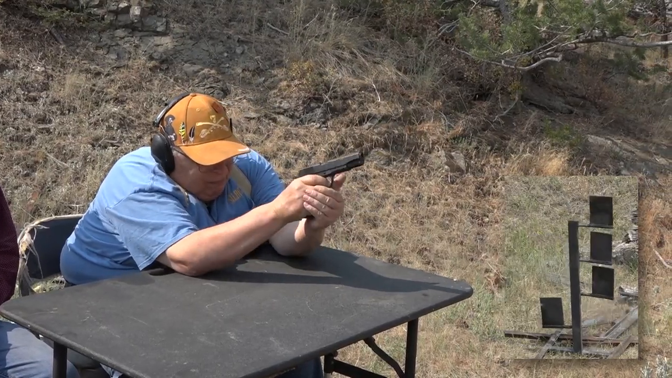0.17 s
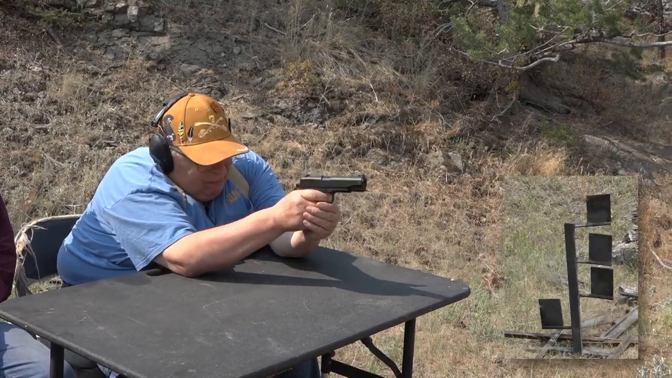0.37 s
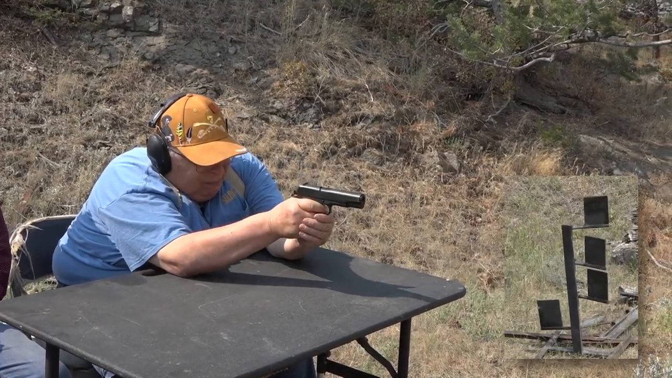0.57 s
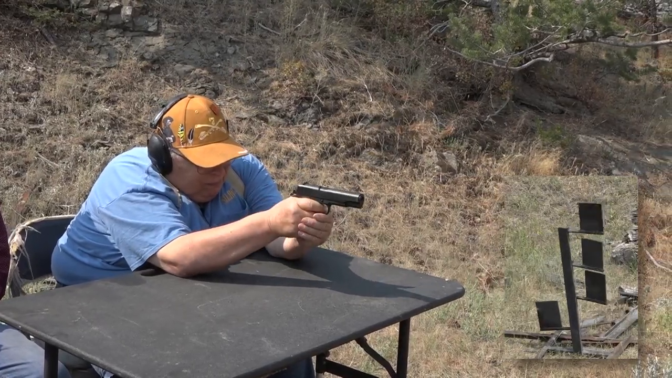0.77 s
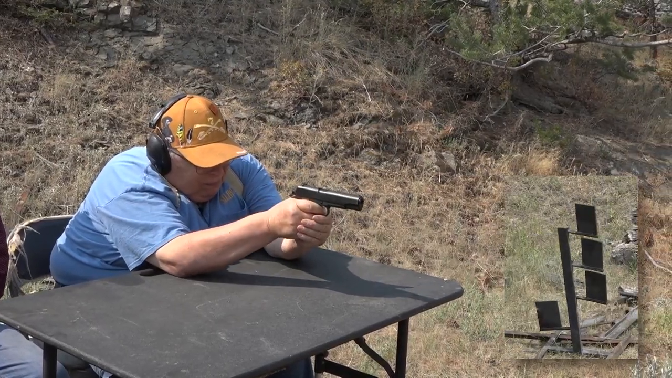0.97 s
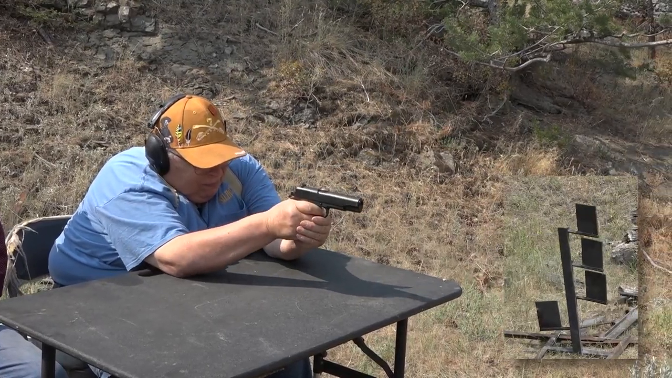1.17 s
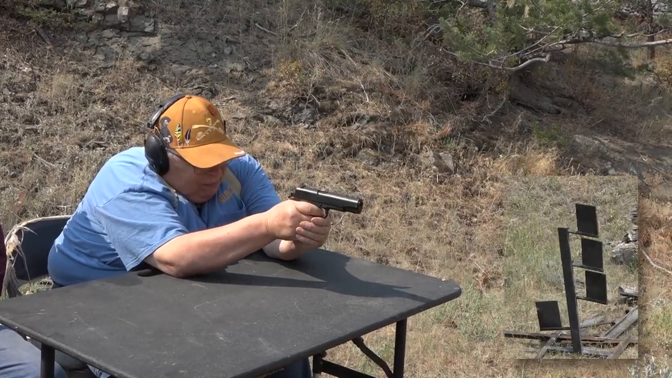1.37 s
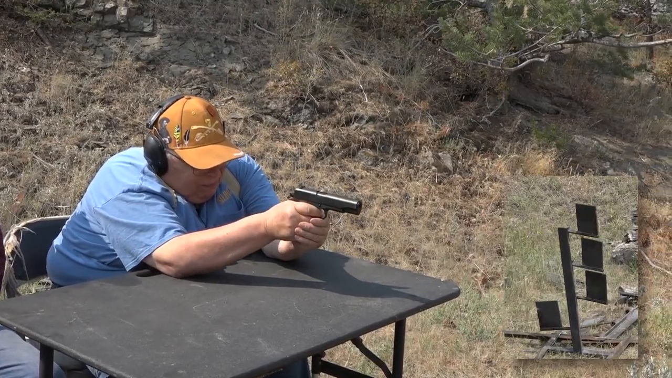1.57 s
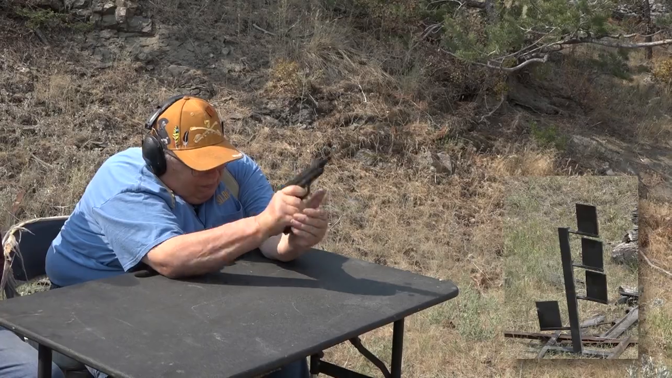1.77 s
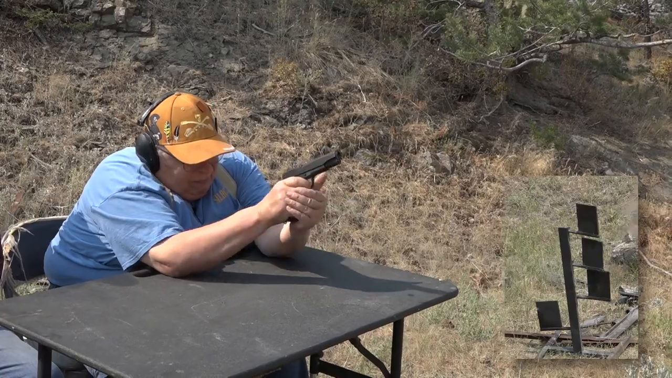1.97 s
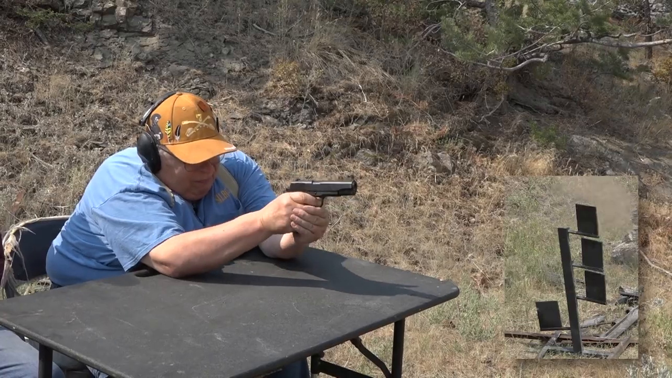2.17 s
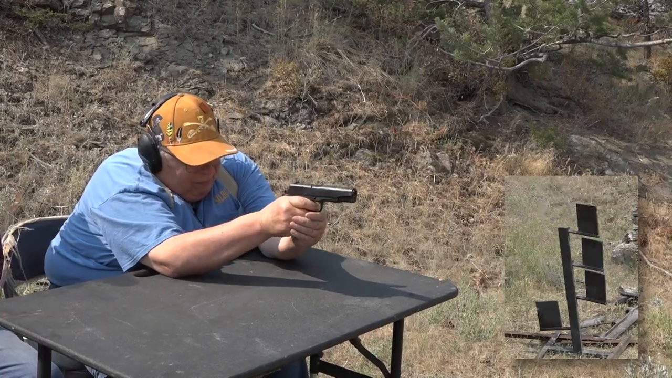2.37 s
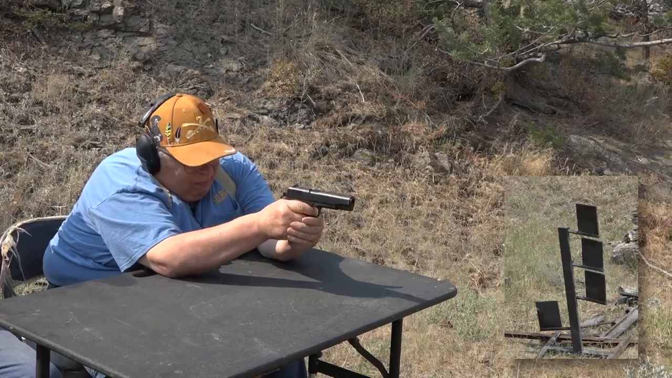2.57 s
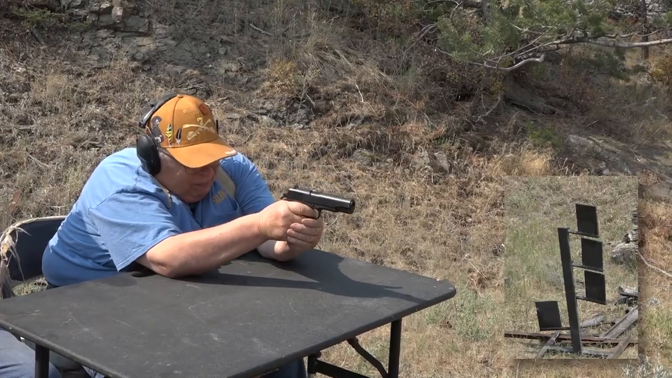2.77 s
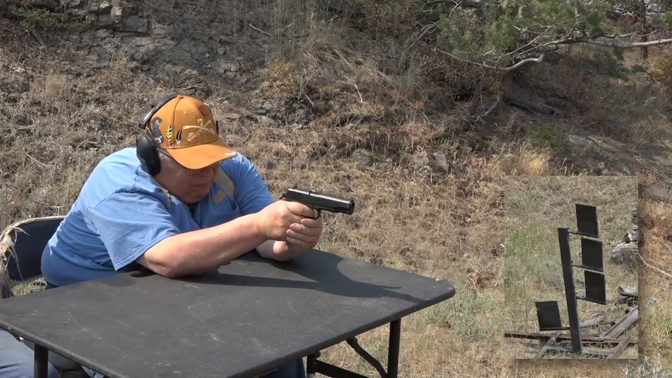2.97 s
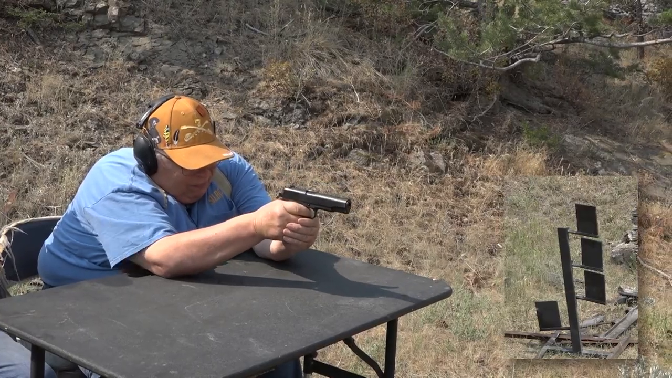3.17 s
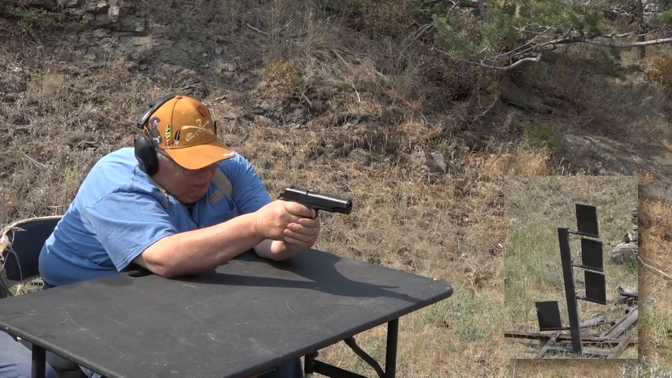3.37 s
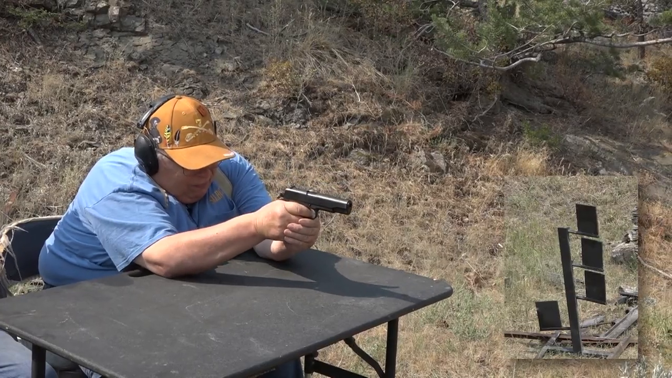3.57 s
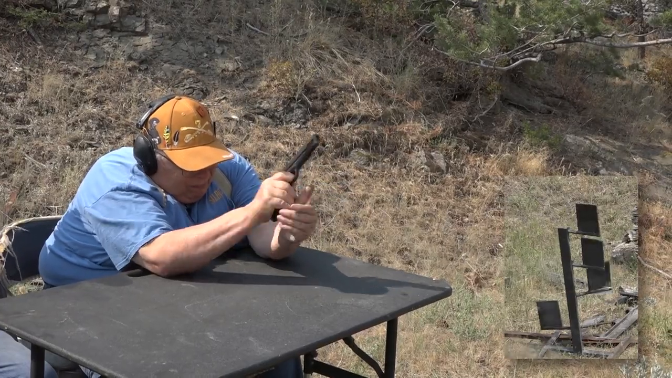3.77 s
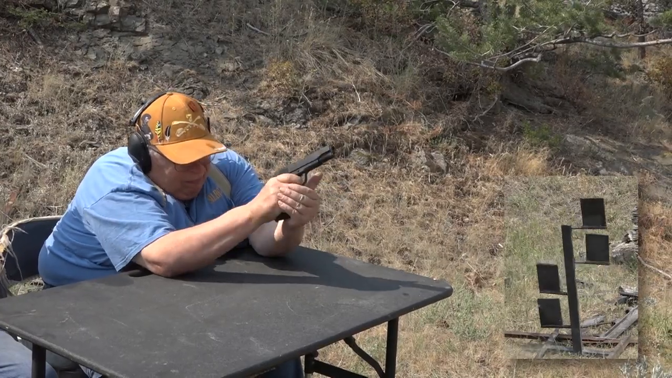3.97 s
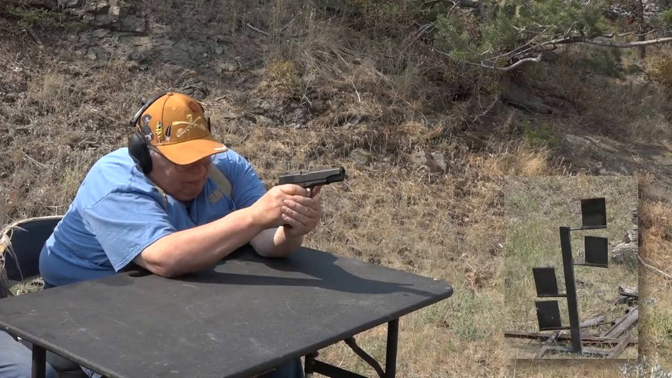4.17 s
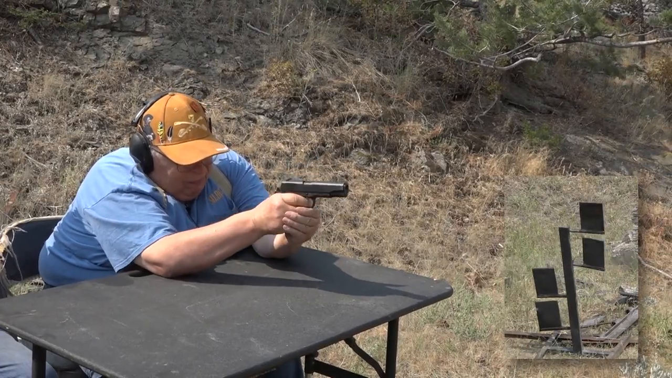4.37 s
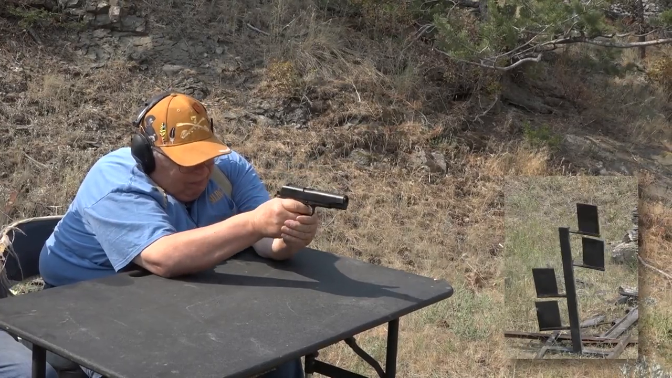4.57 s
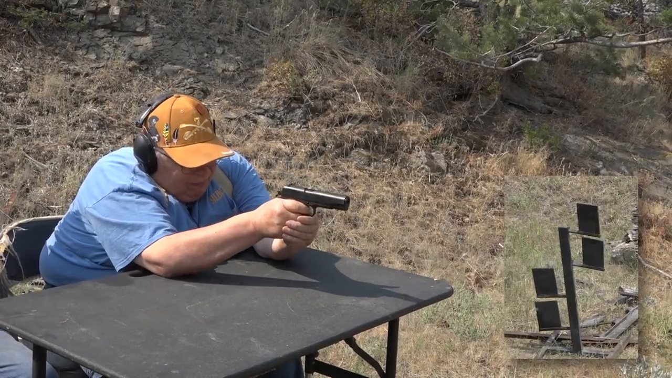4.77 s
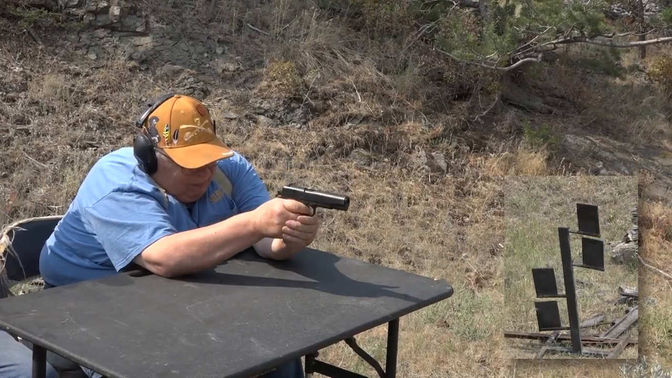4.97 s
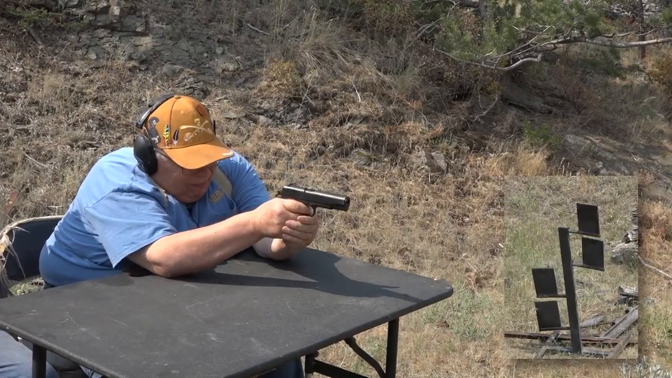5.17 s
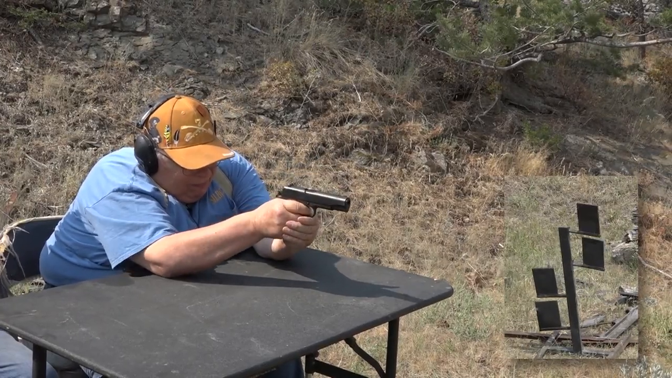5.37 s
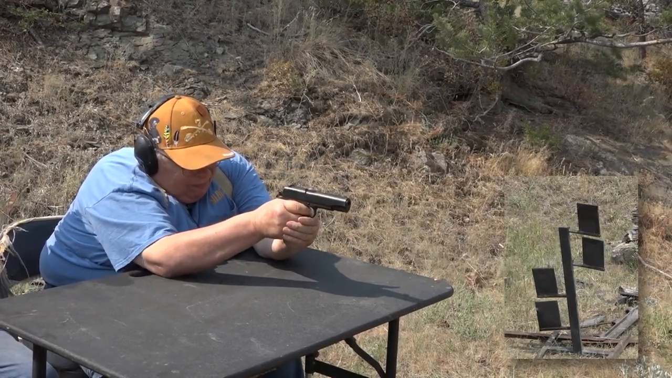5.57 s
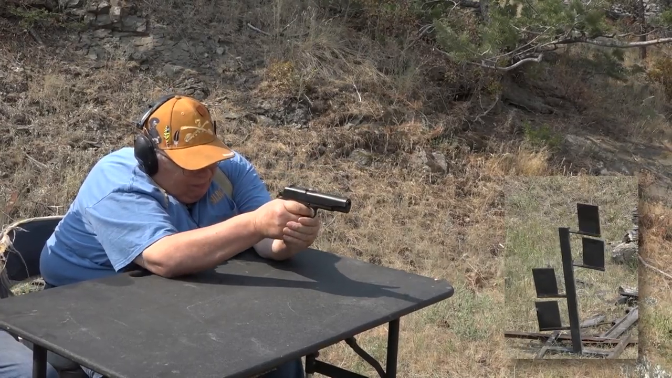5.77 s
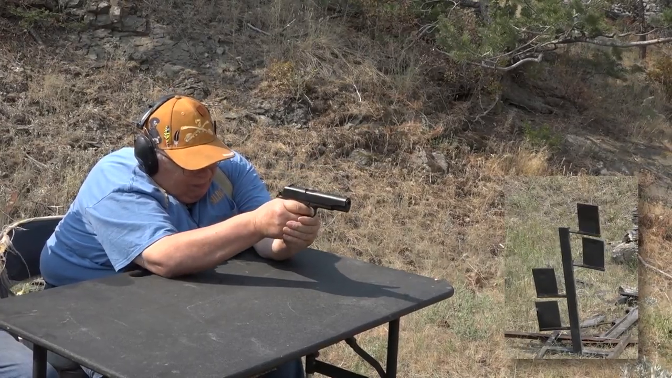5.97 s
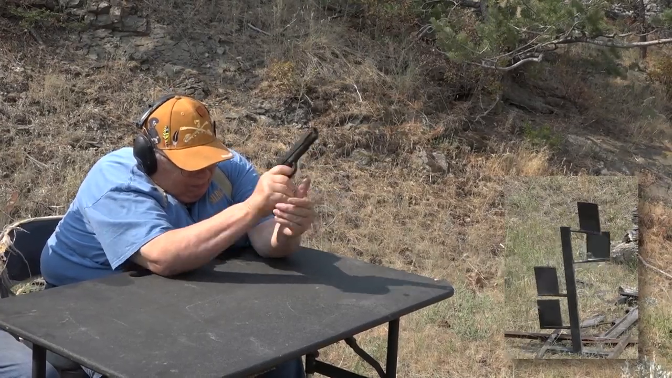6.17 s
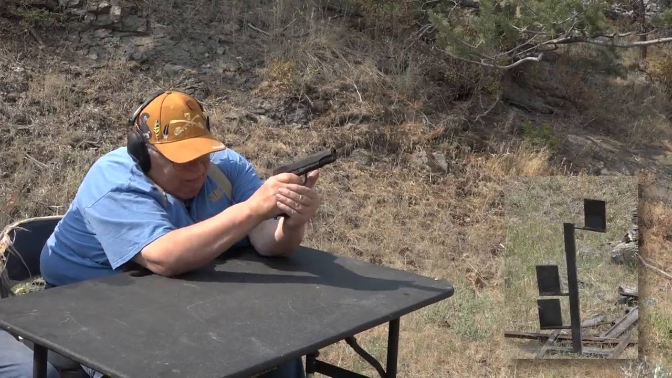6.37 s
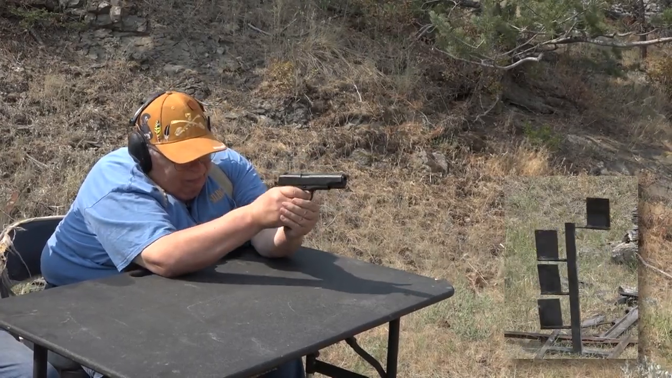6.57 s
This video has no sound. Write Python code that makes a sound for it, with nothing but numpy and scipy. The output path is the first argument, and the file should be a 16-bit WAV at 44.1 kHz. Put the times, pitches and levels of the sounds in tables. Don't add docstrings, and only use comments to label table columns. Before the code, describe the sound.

Three loud pistol blasts about two seconds apart outdoors, each answered by a short metallic clang and rolling echo over gusty wind.

```python
import sys
import numpy as np
from scipy import signal
from scipy.fft import rfft, irfft, next_fast_len
from scipy.io import wavfile

SR = 44100
rng = np.random.default_rng(int(sys.argv[2]) if len(sys.argv) > 2 else 0)


def boost_factor(decibels):
    exponent = np.asarray(decibels, float) / 20
    return 10 ** exponent


def digitize_waveform(pressure):
    field = np.atleast_2d(pressure).T
    bounded = np.clip(field, -1, 1)
    quanta = np.round(bounded * 32767).astype(np.int16)
    wavfile.write(sys.argv[1], SR, quanta)


N = 292455
T = np.arange(N) / SR
RIGHT_LEAD_S = .0022

# start in seconds, level in dB, far hillside echo in dB.
SHOTS = [
    (-.103, 0.9, -4.5),
    (1.814, -0.02, -4.5),
    (3.784, 0.77, -1),
    (6.169, 0.65, -4.5),
]
# frequency in Hz, gain in dB per second of travel.
AIR_LOSS = [(3500, -4.8), (6500, -16.5), (10000, -32), (14000, -71.5)]


def rms_one(x):
    return x / np.sqrt(np.mean(x ** 2) + 1e-20)


def colour(x, spectrum):
    hz, db = np.transpose(spectrum)
    size = next_fast_len(x.shape[-1])
    grid_hz = np.arange(size // 2 + 1) * SR / size + 1
    gain = boost_factor(np.interp(np.log(grid_hz), np.log(hz), db))
    return irfft(rfft(x, size) * gain, size)[..., :x.shape[-1]]


def drift(rate_hz, size):
    r = np.exp(-80 * np.pi * rate_hz / SR)
    slow = signal.lfilter([1], [1, -2 * r, r * r], rng.standard_normal((2, size // 40 + 2002)))
    at = np.arange(size) / 40 + 2000
    return np.array([np.interp(at, np.arange(len(s)), rms_one(s)) for s in slow])


def resonate(x, hz, width_hz):
    r = np.exp(-np.pi * width_hz / SR)
    poles = [1, -2 * r * np.cos(2 * np.pi * hz / SR), r * r]
    return signal.lfilter([(1 - r * r) / 2, 0, (r * r - 1) / 2], poles, x)


def burst(t60_s, rise_s, size):
    t = np.arange(size) / SR
    return boost_factor(-60 * t / t60_s) * (1 - np.exp(-t / rise_s))


def sides(left_right_db):
    return boost_factor(np.array([[.5], [-.5]]) * left_right_db)


def peak_one(x):
    return x / np.abs(x).max(1, keepdims=True)


def add(out, at_s, x):
    i = round(at_s * SR)
    part = x[:, max(-i, 0):max(out.shape[1] - i, 0)]
    out[:, max(i, 0):max(i, 0) + part.shape[1]] += part


def add_spaced(out, at_s, x):
    add(out[:1], at_s, x[:1])
    add(out[1:], at_s - RIGHT_LEAD_S, x[1:])


def trees():
    # frequency in Hz, level in dB per Hz.
    rustle = [(24, -45.5), (40, -17), (194, -4.5), (329, -17.5), (363, -4.5), (467, -7), (1150, -1.5),
              (1300, -3.5), (1410, -5), (2260, -13.5), (14500, -44), (16000, -47)]
    # frequency in Hz, left-right in dB.
    tilt = [(60, -0.5), (110, 2), (200, -4), (380, -6), (700, -4.5), (1290, -6.5), (2380, 1.5), (4400, 5),
            (8120, 3.5), (15000, 6.5)]
    noise = colour(rng.standard_normal((2, N)), rustle)
    noise = colour(noise, [(12800, 0), (13500, -8), (15500, -16)])
    left = colour(noise[0], [(hz, db / 2) for hz, db in tilt])
    right = colour(noise[1], [(hz, -db / 2) for hz, db in tilt])
    shot_s = np.array(SHOTS)[:, 0]
    since_s = T - shot_s[np.searchsorted(shot_s, T) - 1]
    breeze_db, recover_db_per_s = -57, 2.22
    level_db = breeze_db + recover_db_per_s * since_s + .6 * drift(1.7, N)
    return boost_factor(level_db) * rms_one(np.array([left, right]))


def wind():
    # centre in seconds, peak in dB, left-right in dB, half length in seconds.
    gusts = [(.22, -53, 14.5, 0.13), (.5, -55.5, -12, 0.32), (0.888, -49.5, 22, 0.097),
             (1.12, -54, 10.5, 0.11), (1.3, -55.5, 6.5, 0.18), (1.57, -46.5, 9.5, 0.18),
             (2.24, -44.5, 5.5, 0.091), (2.389, -49, 5.5, 0.068), (2.592, -63.5, -16.5, 0.22),
             (3.14, -58.5, -19.5, 0.14), (3.386, -52.5, -22.5, 0.074), (3.483, -58, 23, 0.078),
             (3.698, -47, 7, 0.15), (4.1, -58.5, 0, 0.31), (4.623, -59, -4, 0.34), (5.05, -57, 14.5, .12),
             (5.209, -55, -22.5, 0.051), (5.32, -61, 12, 0.14), (5.6, -55.5, 11.5, 0.085),
             (5.8, -39.5, -3, 0.098), (6.102, -41.5, 1.5, 0.13), (6.485, -44, -3, 0.23)]
    lull_db, lumpy_db = -78, 3.0
    edge_db, edge_growth = -12, 0.15
    swells = sum(sides(pan_db) * boost_factor(db - 10 * ((T - s) / half_s) ** 2) for s, db, pan_db, half_s in gusts)
    side_db = 20 * np.log10(boost_factor(lull_db) + swells) + lumpy_db * drift(22, N)
    low, high = rng.standard_normal((2, 2, N))
    rumble = rms_one(colour(low, [(20, -36.5), (60, -4.5), (110, 0.46), (250, -5.5), (500, -12.5),
                                  (2000, -78.5)]))
    edge = rms_one(colour(high, [(100, -8.5), (300, -1.1), (700, -12), (2000, -28.5), (8000, -65.5)]))
    edge_gain = boost_factor(edge_db + edge_growth * (side_db + 52.5))
    return boost_factor(side_db - 0.5) * (rumble + edge * edge_gain)


def puffs():
    # start in seconds, peak in dB, t60 in seconds.
    eddies = [
        (0.843, -19, 0.043),
        (1.094, -32, 0.11),
        (1.604, -35, 0.24),
        (3.357, -54, 0.13),
        (4.985, -22.5, 0.14),
        (5.575, -45.5, 0.2),
    ]
    out = np.zeros((2, N))
    for at, db, t60 in eddies:
        x = colour(rng.standard_normal((1, 6000)),
                   [(40, -17), (130, -3.8), (510, -6), (2500, -34.5), (6000, -60), (20000, -80)])
        add(out[:1], at - .003, boost_factor(db + 1) * rms_one(x) * burst(t60, 0.007, 6000))
    return out


def creak():
    # start in seconds, length in seconds, pitch in Hz, level in dB.
    creaks = [
        (2.88, 0.224, 847, -66),
        (3.25, 0.069, 850, -61.5),
    ]
    drop_hz, drop_s = 39.5, .025
    out = np.zeros((2, N))
    for at, length, hz, db in creaks:
        t = np.arange(0, length, 1 / SR)
        ends = np.clip(np.minimum(t, length - t) / .03, 0, 1)
        fade = ends * boost_factor(2.5 * drift(40, len(t))[0])
        pitch_hz = hz + drop_hz * np.exp(-t / drop_s) + 14 * drift(30, len(t))[0]
        tone = np.sin(2 * np.pi * np.cumsum(pitch_hz) / SR)
        add(out, at, sides(-23.0) * boost_factor(db + 4.5) * fade * tone)
    return out


def rocking():
    # start in seconds, peak in dB.
    rocks = [(0.565, -40), (0.635, -43), (0.671, -40), (0.765, -40), (0.844, -42), (2.439, -43),
             (4.39, -40.5), (4.434, -40), (4.501, -47), (4.591, -42), (4.704, -42), (4.809, -46),
             (5.016, -48)]
    # start in seconds, number of touches, first touch in dB.
    settling = [
        (.524, 13, -44),
        (2.5, 3, -45),
        (4.46, 9, -45),
    ]
    # frequency in Hz, level in dB, width in Hz.
    stand = [(554, -1, 100), (617, -16, 15), (1056, -3, 210), (1343, -2.5, 51), (1794, -15, 250)]
    gap_s, fade_db = .052, .4
    touches = list(rocks)
    for start, count, db in settling:
        for k in range(count):
            touches.append((start + gap_s * (k + rng.uniform(-.3, .3)), db - fade_db * k))
    out, t = np.zeros((2, N)), np.arange(2500) / SR
    for at, db in touches:
        scuff = rng.standard_normal(2500) * np.exp(-(t / 0.016) ** 2)
        x = np.zeros(2500)
        for hz, mode_db, width_hz in stand:
            mode = resonate(resonate(scuff, hz, width_hz), hz, width_hz * 2)
            x += boost_factor(mode_db + rng.normal(0, 1.5)) * mode
        add(out, at - .003, boost_factor(db + 3.5) * boost_factor([[-16], [0]]) * x / np.abs(x).max())
    return out


def ticks():
    # start in seconds, peak in dB, left-right in dB.
    contacts = [
        (0.1501, -24, -8),
        (0.9268, -57, 12),
        (2.0223, -26, -3),
        (2.8479, -49, 23),
        (3.9833, -24, -6),
        (4.4894, -59, 10),
        (5.3694, -69.5, 4.5),
        (6.4961, -37.5, -30),
    ]
    out = np.zeros((2, N))
    for at, db, pan_db in contacts:
        x = resonate(rng.standard_normal((2, 900)) * burst(.009, .0001, 900), 10000, 9000)
        x = colour(x, [(2000, -25), (3200, 15), (5000, 5), (8000, 0), (15000, 0), (16500, -15)])
        add(out, at, boost_factor(db + 4) * sides(pan_db) * peak_one(x))
    return out


def long_mode(t, mode, turn, partner):
    hz, db, fall_s, back_db, pan_db = mode
    back_s, half_s, roundness, dip_s, edge_db = turn
    split_hz, share = partner
    edge_fade_db_per_s = 105
    front = boost_factor(db - 20 * (t / fall_s) ** roundness) + boost_factor(db + edge_db - edge_fade_db_per_s * t)
    facing = front - boost_factor(back_db - 20 * ((t - back_s) / half_s) ** 2)
    gain = facing * boost_factor(8 + 1.3 * drift(9, len(t))) * sides(pan_db)
    phase = rng.uniform(0, 6) + .6 * drift(12, len(t))
    pair = 1 - share * np.exp(2j * np.pi * split_hz * (t - dip_s))
    return gain * np.imag(pair * np.exp(1j * (2 * np.pi * hz * t + phase)))


def upper_mode(t, hz, db, t60_s):
    late_db, late_stretch = -26, 2.0
    aim_db = np.interp(hz, [9500, 14000], [-3.5, 13])
    dying = boost_factor(-60 * t / t60_s) + boost_factor(late_db - 60 * t / t60_s / late_stretch)
    gain = dying * boost_factor(db + 3.0 * drift(15, len(t))) * sides(aim_db)
    return gain * np.sin(2 * np.pi * hz * t + rng.uniform(0, 3.9, (2, 1)))


def splash():
    crack = resonate(rng.standard_normal((2, 9000)), 6000, 9000) * burst(0.076, 0.00073, 9000)
    spray = resonate(rng.standard_normal((2, 9000)), 13500, 6000) * burst(0.15, 0.003, 9000)
    return crack + boost_factor(-10) * spray


def plates():
    # start in seconds, crack left in dB, crack right in dB, upper modes in dB.
    strikes = [
        (0.001, -11, -31, -26),
        (1.916, -15, -30, -22.5),
        (3.883, -8.5, -21, -17.5),
        (6.269, -8.5, -32.5, -13),
    ]
    # back face in seconds after the strike, its half width in seconds, front roundness,
    # first dip of the partners in seconds, edge-on level in dB.
    turns = [
        (.195, .125, 1.8, .11, -30),
        (.4, .25, 1.75, .037, -13),
        (.302, .15, 1.05, .024, -19),
        (.291, .243, 2.5, .065, -26),
    ]
    # frequency in Hz, front in dB, seconds until 20 dB down, back face in dB,
    # left-right in dB.
    long_modes = [
        [(1736, -21, .11, -35, -8), (3598, -29.5, .13, -39, -1), (4657, -30, .07, -63, 9),
         (10710, -42, .05, -68, 11)],
        [(1725, -29, .143, -85, -10), (3582, -43, .27, -80, -8), (4665, -43, .131, -85, -1),
         (10640, -41, .1, -68, 10)],
        [(1723, -22.5, .04, -51, -10), (3584, -33, .17, -75, -1), (4662, -15.5, .09, -78, 6),
         (10620, -33, .055, -53, 8)],
        [(1730, -17, .108, -36.5, -8), (3598, -23.5, .19, -41.5, -2), (4670, -25, .126, -61, 7),
         (10670, -33, .09, -85, 3.5)],
    ]
    # frequency in Hz, level in dB, t60 in seconds.
    upper_modes = [
        [(6570, -11, .12), (8716, -20.5, .3), (9205, -6.5, 0.23), (9390, -8, .36), (14300, -5, .14),
         (14520, -3.5, .25), (14720, -20, .3), (15100, -8.1, .08)],
        [(6449, -7, 0.32), (6901, -11.5, .19), (8640, -20.5, .2), (9367, -5, 0.29), (12750, -30, .35),
         (14180, -14.5, 0.46), (14520, -5.5, 0.39), (14940, -21, .3)],
        [(6395, -11, .2), (8350, -15.5, .15), (8699, -24, .2), (9302, -6.5, 0.28), (10860, -6, .15),
         (14430, -2.5, .3), (14720, -5.5, .12), (15150, -21.5, 0.2), (16400, -9.5, .08)],
        [(6200, -4, 0.12), (6900, -18, .15), (8450, -16, 0.2), (9335, -10.5, .3), (10860, -8, 0.25),
         (11200, -15.5, .14), (12300, -14.5, 0.12), (14500, -10, .27), (14770, -11.5, 0.141), (15360, -6, .06)],
    ]
    # split in Hz, partner share.
    partners = [(6.7, 0.13), (9, 0.14), (13, .5), (12, .35)]
    ring_s = .75
    out = np.zeros((2, N))
    t = np.arange(round(ring_s * SR)) / SR
    ends = np.clip(t / 0.00053, 0, 1) * np.clip((ring_s - t) / 0.15, 0, 1)
    for (at, l_db, r_db, upper_db), turn, modes, uppers in zip(strikes, turns, long_modes, upper_modes):
        for mode, partner in zip(modes, partners):
            add(out, at, ends * long_mode(t, mode, turn, partner))
        for hz, db, t60 in uppers:
            add(out, at, ends * upper_mode(t, hz, db + upper_db, t60))
        add(out, at, boost_factor([[l_db], [r_db]]) * splash())
    return out


def echoes():
    # seconds after the shot, left in dB, right in dB,
    # centre in Hz, t60 in seconds.
    broad = [(-.005, -39.5, -25, 7130, 0.038), (.002, -32.5, -25, 76, 0.056),
             (0.035, -12.5, -19.5, 700, 0.011), (.048, -35, -22, 5500, .03), (.063, -12.5, -10, 1253, .025),
             (.001, -13, -14.5, 2602, .02), (.062, -14.5, -16, 8500, 0.04), (.03, -22, -23.5, 12640, .12),
             (0.079, -7, -15, 750, 0.0079), (0.159, -27.5, -29, 800, 0.033), (.233, -27, -22, 750, 0.01),
             (.265, -22, -24.5, 635, 0.044), (0.295, -38, -43, 700, .02), (.533, -29, -24.5, 602, 0.026),
             (0.532, -30.5, -36.5, 2715, 0.024), (0.535, -55, -47, 5150, 0.0302),
             (0.547, -43, -29.5, 920, 0.038)]
    hollow = [
        (.003, -23, -23, 221, 0.045),
        (.003, -13, -18, 383, .06),
        (0.535, -33, -24, 1370, 0.011),
    ]
    out = np.zeros((2, N))
    paths = [(row, .72) for row in broad] + [(row, .22) for row in hollow]
    for (delay, l_db, r_db, hz, t60), width in paths:
        x = rng.standard_normal((2, 4000)) * burst(t60, 0.0003, 4000)
        x = resonate(resonate(x, hz, width * hz), hz, width * hz * 2)
        x = colour(x, [(f, loss_db * abs(delay)) for f, loss_db in AIR_LOSS])
        x = boost_factor([[l_db + 5.5], [r_db + 8]]) * peak_one(x)
        for at, db, far_db in SHOTS:
            add_spaced(out, at + delay, boost_factor(db + far_db * (delay > .5)) * x)
    return out


def through_air(x, t):
    hz, db_per_s = np.transpose(AIR_LOSS)
    grid_hz, spectrum = np.arange(len(t) // 2 + 1) * SR / len(t), rfft(x)
    bands = [irfft(spectrum * np.interp(grid_hz, hz, share), len(t)) for share in np.eye(len(hz))]
    return sum(band * boost_factor(loss_db * t) for band, loss_db in zip(bands, db_per_s))


def banks(t):
    # seconds after the shot, length in seconds, level in dB, left-right in dB, treble share in dB.
    ground = [
        (0, 0.011, -3, -1.7, -9.5),
        (0.022, 0.29, -25.5, -6, -7.5),
        (0.041, 0.07, -22.5, 0.1, -5.5),
        (0.342, 0.069, -41, -3.5, -6.5),
        (0.414, .17, -46, -3.5, -6.5),
    ]
    rise_share, sag_db_per_s, release_db_per_s, treble_release = 0.21, 19.5, 597.5, .75
    low, high = 0, 0
    for after, length, db, pan_db, treble_db in ground:
        u = t - after
        release_db = release_db_per_s * np.maximum(u - length, 0)
        swell = np.clip(u / (rise_share * length), 0, 1)
        gain = sides(pan_db) * swell * boost_factor(db - sag_db_per_s * u)
        low = low + gain * boost_factor(-release_db)
        high = high + gain * boost_factor(treble_db - treble_release * release_db)
    return low, high


def shots():
    # frequency in Hz, level in dB per Hz.
    body_spectrum = [(59, -61.5), (100, -25.5), (294, -19.5), (573, -3), (722, -7), (1070, -4.5),
                     (1550, -14), (2600, -25), (3380, -42), (5720, -120)]
    treble_spectrum = [(1180, -17), (2000, 2), (5050, -6.5), (8510, -16.5), (13200, -12.5), (15800, -23),
                       (16500, -34)]
    lumpy_db, fresh_share = 2.25, 0.23
    size, out = SR, np.zeros((2, N))
    t = np.arange(size) / SR
    lumps = boost_factor(lumpy_db * np.clip(t / 0.057, 0, 1) * drift(60, size))
    low_gain, treble_gain = banks(t)
    pulses = rms_one(rng.standard_normal((2, size)) * boost_factor(1.3 * rng.exponential(1, (2, size))))
    for at, db, _ in SHOTS:
        new_low, new_high = rng.standard_normal((2, 2, size))
        body = rms_one(colour(pulses + fresh_share * new_low, body_spectrum))
        body = body * lumps * low_gain * boost_factor(db)
        body = 0.62 * np.tanh(body / 0.57)
        crests = colour(body ** 2, [(30, -62.5), (60, -23), (120, -20.5), (400, -9.0)])
        treble = through_air(rms_one(colour(new_high, treble_spectrum)), t)
        treble = treble * boost_factor(db) * lumps * treble_gain
        add_spaced(out, at, body + crests + treble)
    return out


def scene():
    background = trees() + wind() + puffs()
    steel = creak() + rocking() + ticks() + plates()
    return background + steel + echoes() + shots()


def top_cut(x):
    return signal.sosfilt(signal.butter(12, 16820, fs=SR, output="sos"), x)


def record(dry):
    overloaded = 0.72 * np.tanh(dry / 1.121)
    mix = colour(overloaded, [(15900, 0), (16900, -27)])
    return top_cut(mix)


dry = scene()
out = record(dry)
digitize_waveform(out)
```